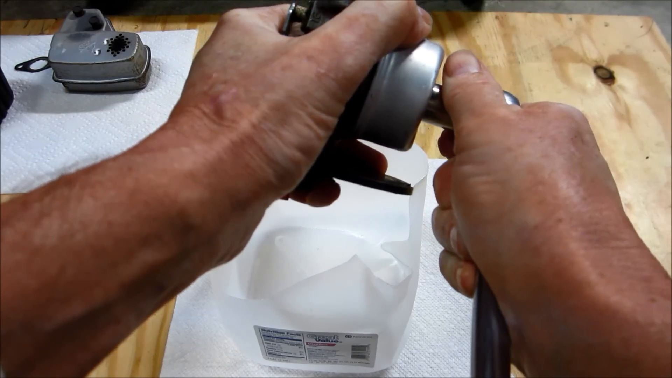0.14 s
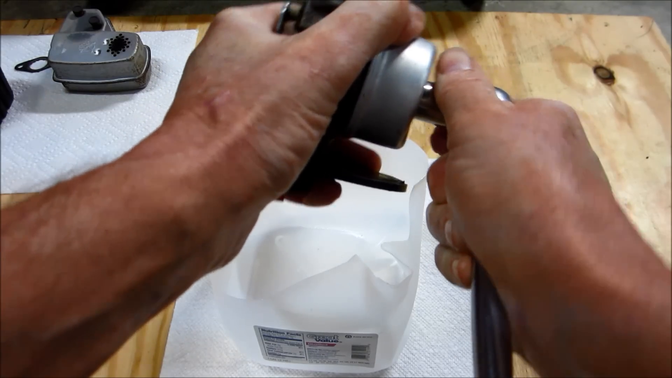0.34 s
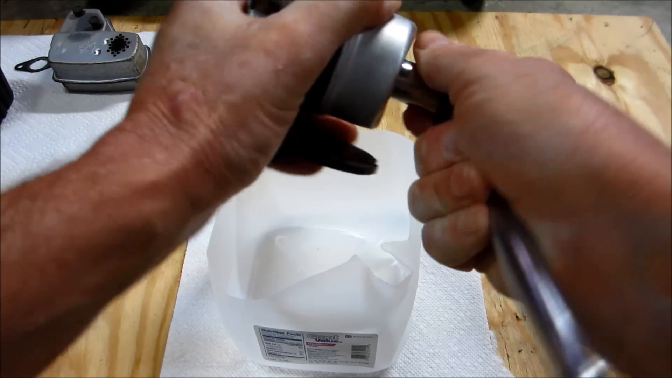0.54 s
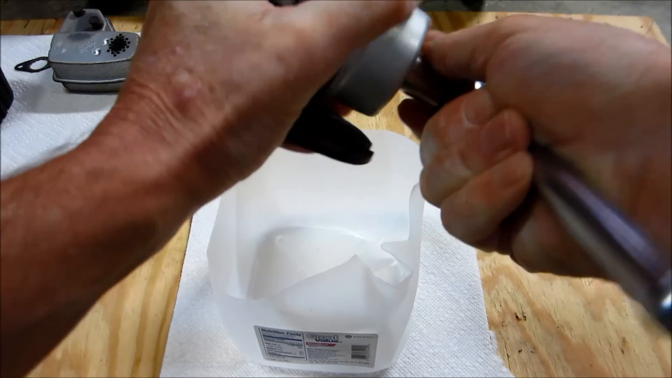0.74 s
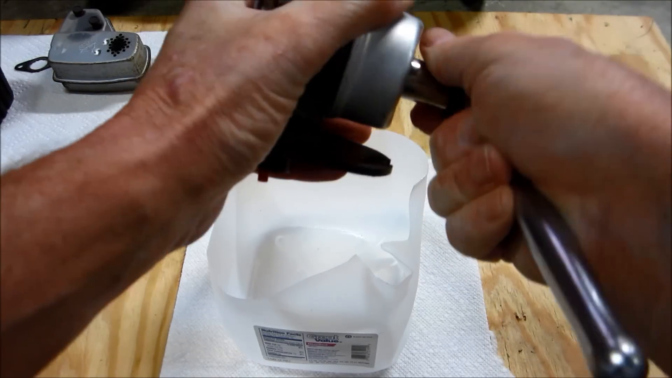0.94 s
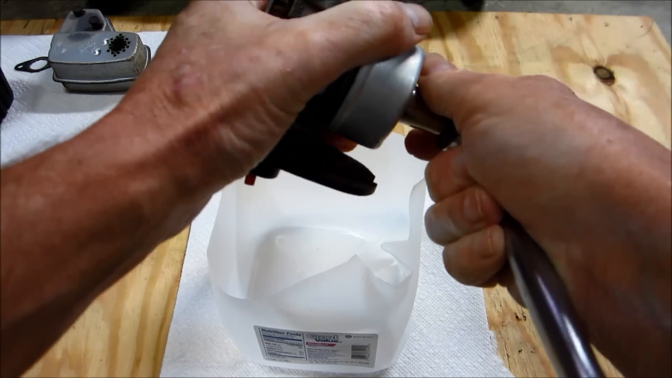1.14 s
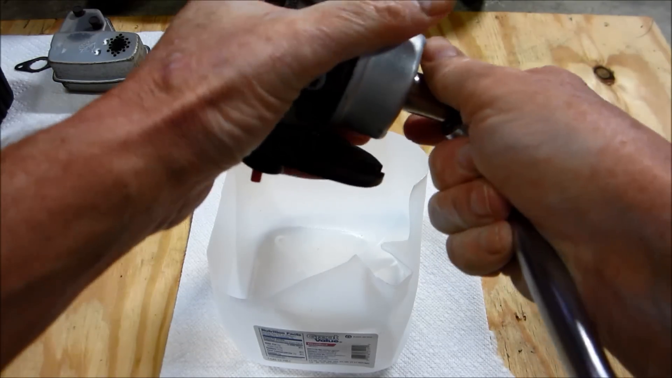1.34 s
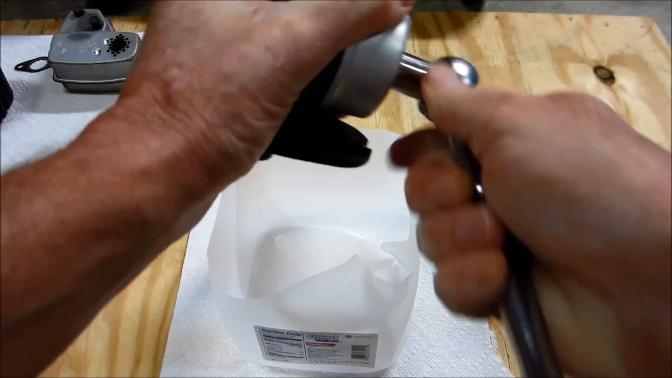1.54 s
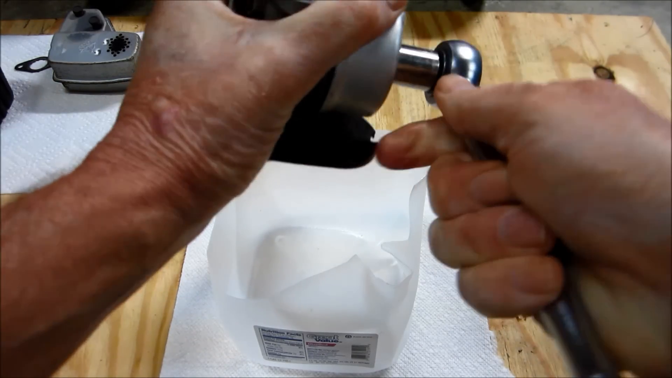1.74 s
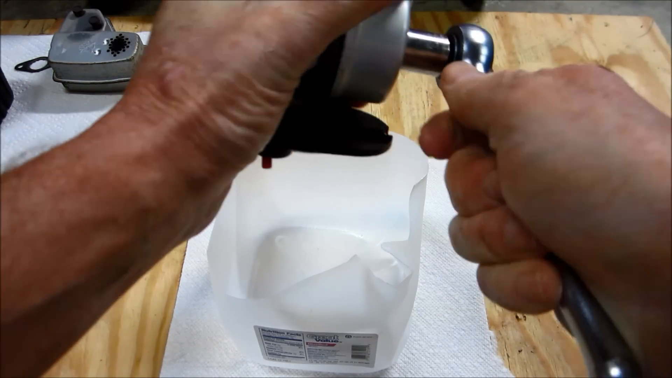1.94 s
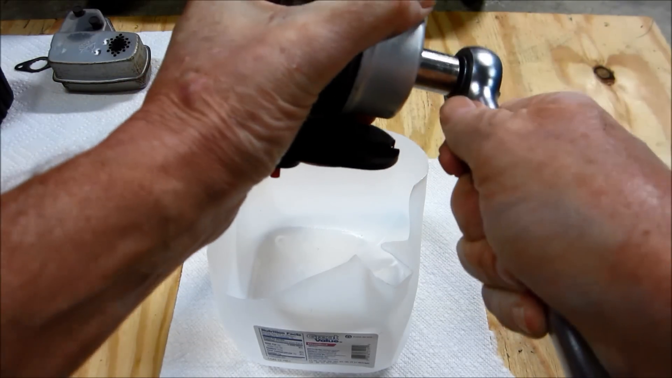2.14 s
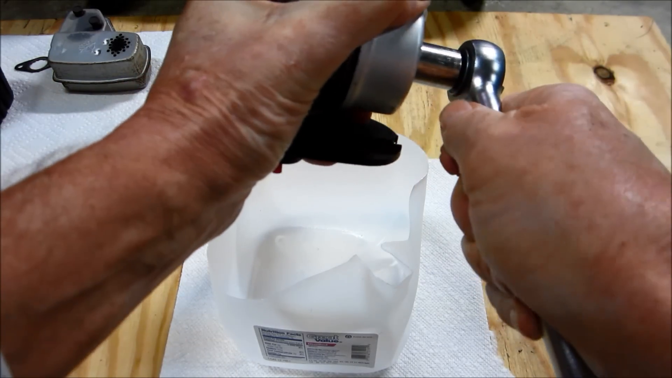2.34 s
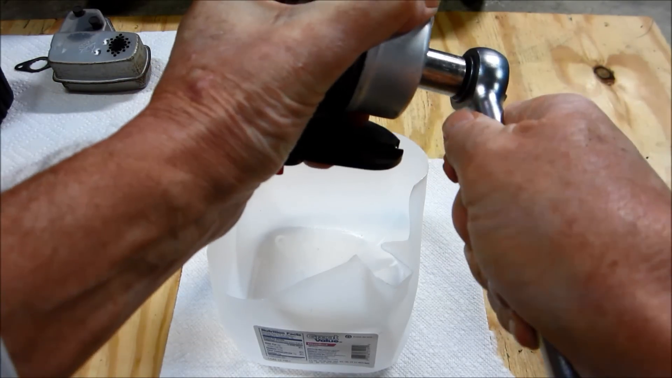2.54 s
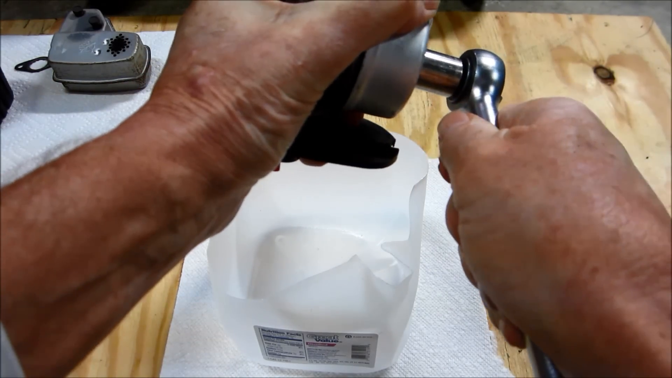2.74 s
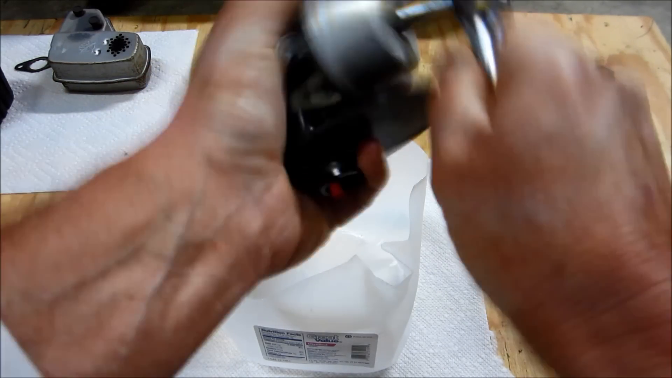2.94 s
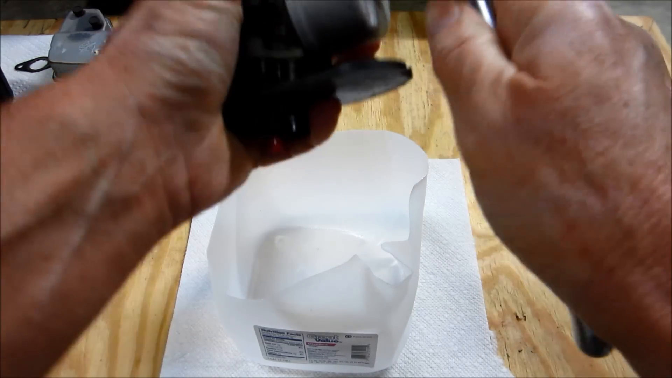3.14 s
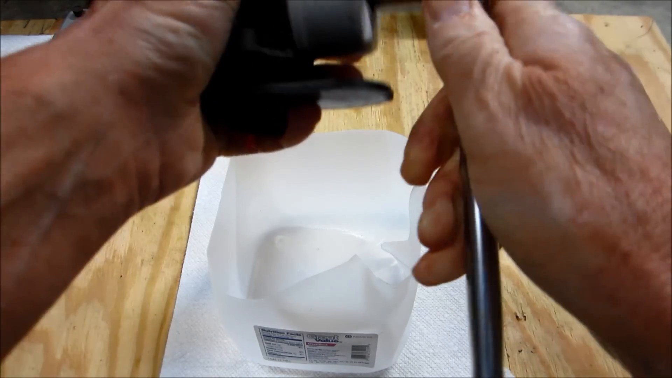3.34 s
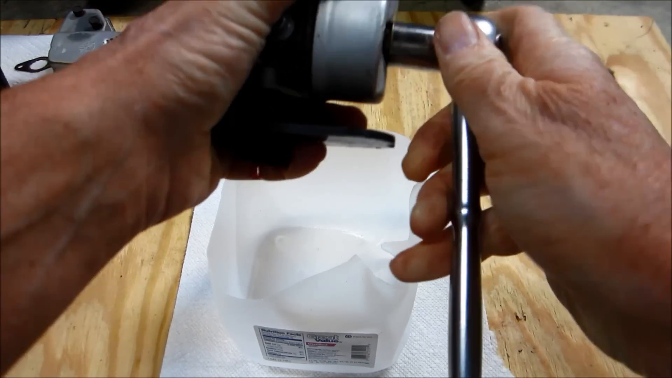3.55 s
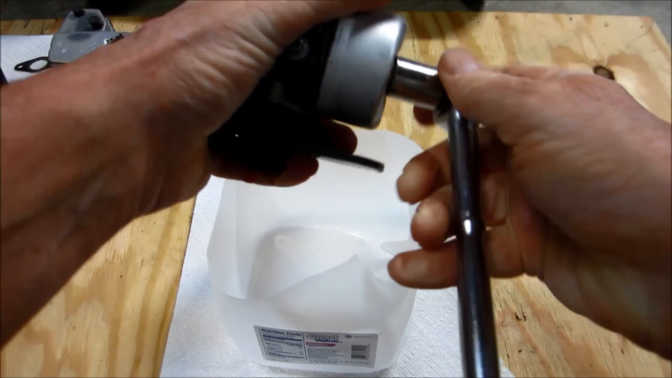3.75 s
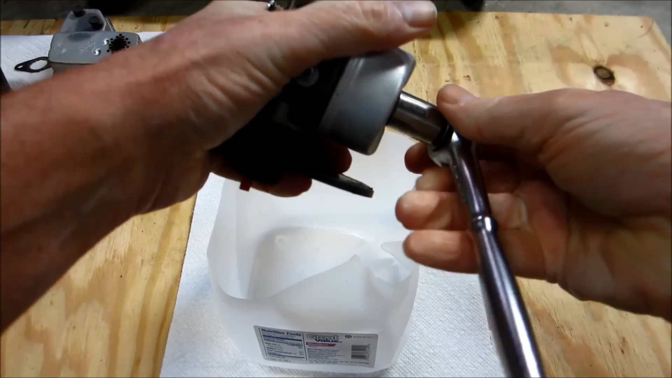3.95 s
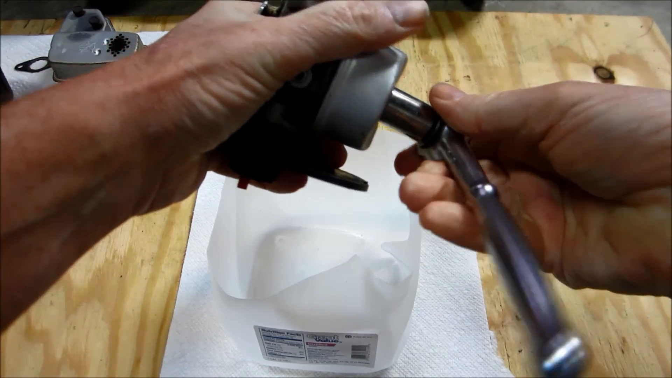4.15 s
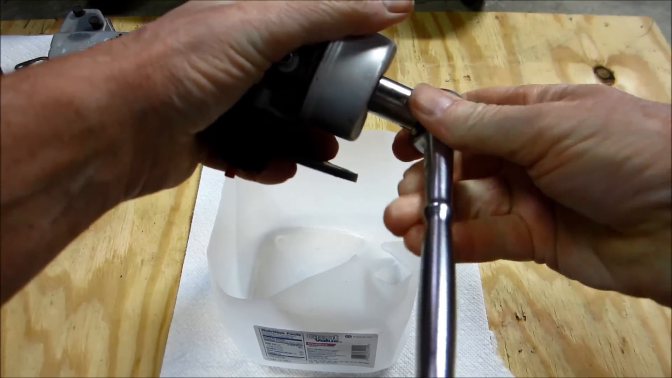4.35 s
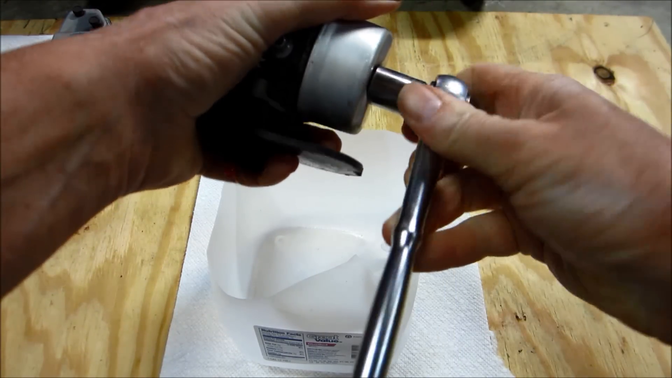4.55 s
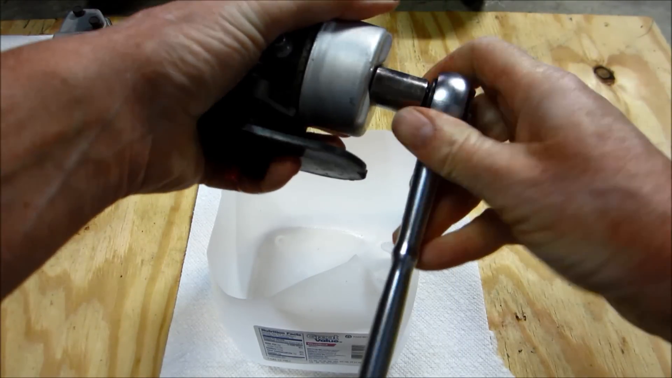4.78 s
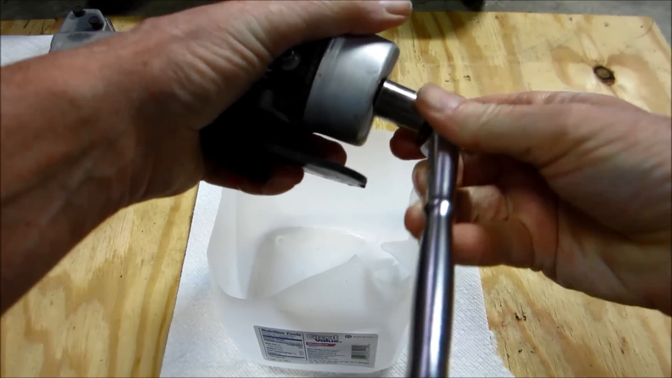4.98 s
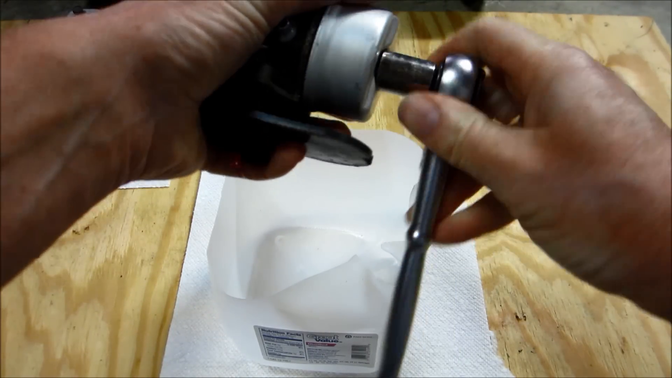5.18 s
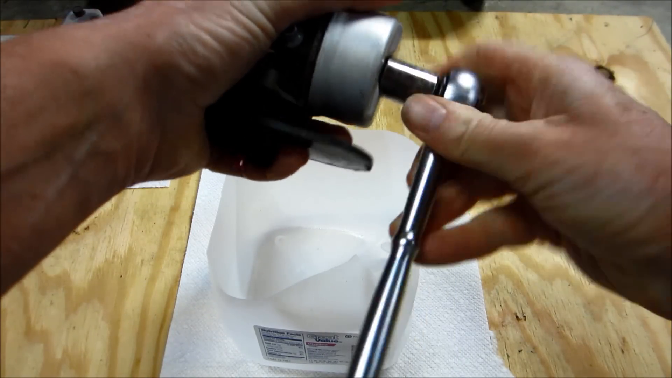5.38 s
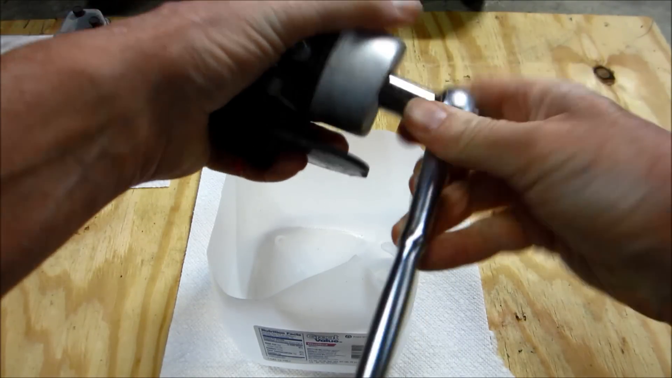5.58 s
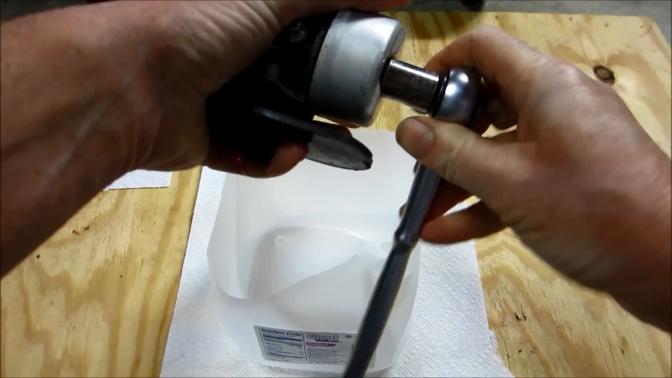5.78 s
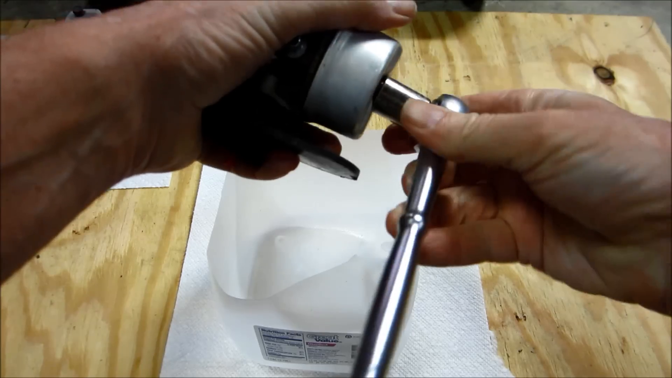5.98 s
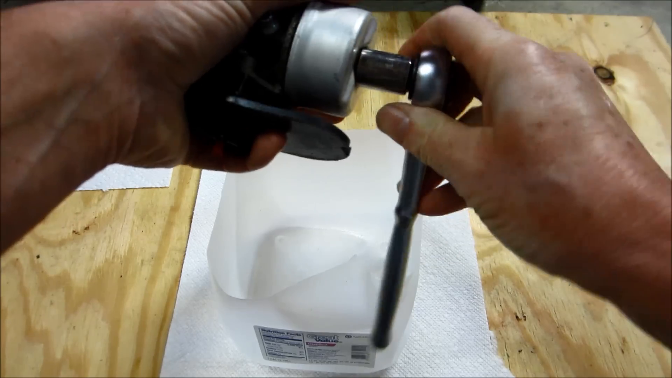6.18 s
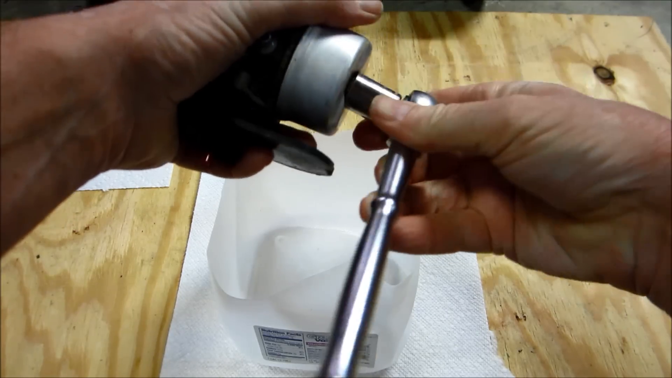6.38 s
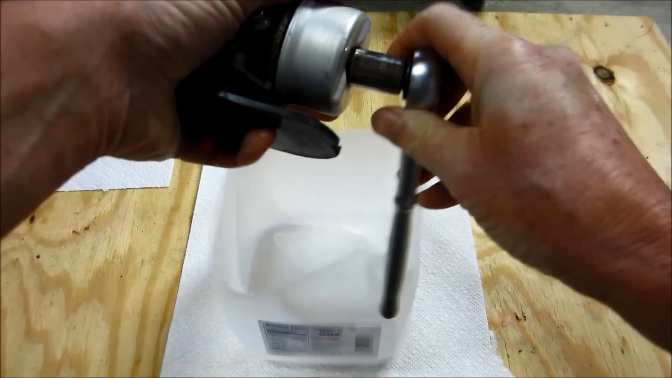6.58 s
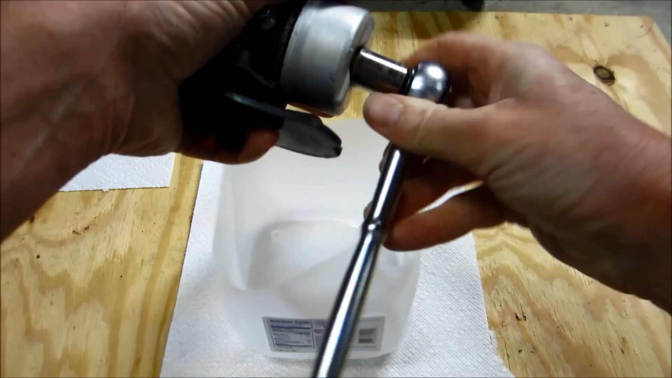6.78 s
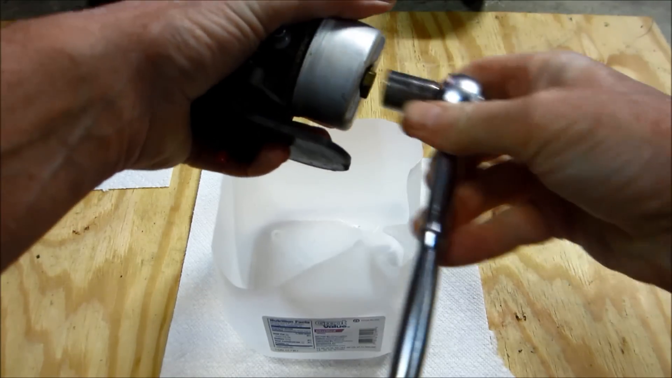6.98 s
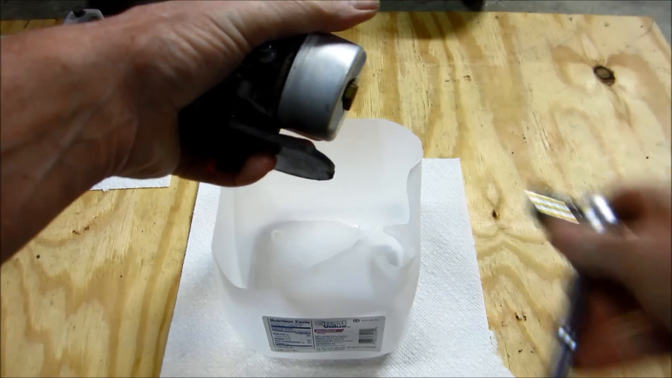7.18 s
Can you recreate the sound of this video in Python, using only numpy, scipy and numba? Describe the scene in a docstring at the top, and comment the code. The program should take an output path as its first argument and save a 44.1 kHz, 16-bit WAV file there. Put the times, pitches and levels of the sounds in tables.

```python
"""A low rumble fills a home workshop; over it a socket ratchet works a nut loose on a small hand-held engine.
The socket rattles on the nut and excites the casing's resonances, and fingers hiss on metal by stick-slip
friction. On each backswing the pawl snaps over the gear teeth and sets the steel handle ringing in its
normal modes. Something knocks once on the bench. A nearby camera's gain control ducks after loud clicks."""
import sys
import numpy as np
from scipy import signal
from scipy.fft import rfft, irfft, next_fast_len
from scipy.io import wavfile
from scipy.ndimage import uniform_filter1d, minimum_filter1d, map_coordinates
from numba import njit

SR = 44100
rng = np.random.default_rng(int(sys.argv[2]) if len(sys.argv) > 2 else 0)


def waveform_to_disk(signal):
    """Save audio, clipped to [-1, 1], as 16-bit WAV at the path in sys.argv[1]."""
    frames = np.transpose(np.atleast_2d(signal))
    scaled = np.clip(frames, -1, 1) * 32767
    samples = np.round(scaled).astype(np.int16)
    wavfile.write(sys.argv[1], SR, samples)


N = 318402

# rumble and hiss of the room: (frequency [Hz], relative spectral density [dB])
ROOM_SPECTRUM = [(20, -6.5), (86, -1), (165, -6), (300, -23), (480, -30.5), (900, -39.5), (1500, -36.5),
                 (1800, -41.5), (3700, -46.5), (7950, -49.5), (15000, -60), (16400, -75)]
# socket and casing rattles, most as the slack is taken up before and after a backswing:
# (time [s], clack level [dB], frequency the struck spot favours [Hz], tick level [dB])
RATTLE_HITS = [(0.1216, -19, 2000, -20), (0.5893, -28.5, 3700, -20.5), (.7862, -34.5, 2800, -42.5),
               (.8425, -29, 3400, -38.5), (0.8633, -28, 2800, -29), (1.6941, -18, 4800, -18),
               (1.7373, -25, 2600, -31), (1.888, -34, 4200, -36), (1.8987, -18, 2400, -40),
               (1.9938, -32, 1200, -31), (2.9342, -11, 2300, -11), (2.9453, -14, 1100, -5.5),
               (2.9693, -5.5, 3100, -10.5), (2.9766, -15, 2800, -18.5), (3.0392, -25.5, 2500, -23.5),
               (3.0882, -6, 3100, -18), (3.1215, -20.5, 3000, -37), (3.3885, -26, 2300, -27),
               (3.394, -17, 3100, -30.5), (3.3996, -21.5, 3100, -17), (4.2237, -32.5, 3000, -42),
               (4.8636, -24, 3000, -38), (4.871, -19, 3000, -39), (5.0873, -13.5, 3050, -22),
               (5.1058, -21.5, 4600, -12), (5.3732, -22, 3000, -43), (5.3912, -21, 3050, -22.5),
               (5.6206, -17, 4600, -19), (5.6519, -19.5, 3000, -12.5), (5.8582, -10, 3100, -18),
               (5.8627, -19, 3100, -7.5), (6.0516, -29, 3000, -35), (6.0756, -13.5, 3000, -40),
               (6.0858, -14, 3100, -25), (6.0962, -15.5, 3200, -17), (6.2805, -17.5, 3000, -23.5),
               (6.2993, -12, 3050, -21), (6.49, -25, 3000, -33), (6.5083, -13.5, 4600, -9.5),
               (6.531, -19.5, 3200, -18), (6.738, -21, 2800, -29), (6.9535, -19, 3000, -36),
               (6.972, -24, 3000, -40)]
# resonances of the casing in the hand: (frequency [Hz], bandwidth [Hz], level [dB])
CASING_MODES = [(900, 900, -7), (2200, 330, -1), (3044, 420, 1.5), (3700, 580, -3), (4604, 250, -3.5)]
# slides of hand and tool: (start [s], end [s], skin hiss level [dB], casing rasp level [dB])
SLIDE_STROKES = [(0.433, 0.628, -65, -59.5), (0.578, 0.618, -41, -51), (0.71, 1.506, -63, -60.5),
                 (0.927, 1.03, -63, -55.5), (1.098, 1.134, -58, -41), (1.169, 1.199, -57, -48.5),
                 (1.32, 1.378, -59.5, -52), (1.46, 1.655, -34, -51), (1.69, 1.745, -50, -47.5),
                 (1.75, 2.028, -57, -55), (2.102, 2.201, -57, -54.5), (2.253, 2.31, -53, -51),
                 (2.926, 2.988, -34.5, -30), (2.97, 3.15, -50, -46), (3.19, 3.46, -49, -54),
                 (4.5, 4.769, -59.5, -63), (4.808, 4.893, -61.5, -52.5), (4.95, 6.95, -53, -56),
                 (5.84, 5.875, -48, -31.5), (6.053, 6.11, -55, -39), (6.278, 6.316, -53, -32.5),
                 (6.942, 6.986, -56.5, -41)]
# skin rubbing on steel: (frequency [Hz], relative spectral density [dB])
SKIN_SPECTRUM = [(2500, -18), (5300, -6), (7300, -7), (11600, -1.5), (16000, -18.5)]
# pawl snaps: (time [s], crack level [dB], handle ring level 6 ms later [dB])
PAWL_SNAPS = [(0.6372, -3, -13), (0.6617, -0.5, -17), (0.687, -8, -11), (3.6474, -7, -17.5),
              (3.7136, -4.5, -22.5), (3.7745, -11, -17), (3.851, -7, -17.5), (3.8973, 0, -17),
              (3.9542, -9, -21.5), (4.0397, -5, -22), (4.1151, -5, -21), (4.8918, -5.5, -17),
              (4.9081, -3.5, -11.5), (4.9271, -2, -18.5), (4.9562, -5.5, -19), (5.0213, -3, -21),
              (5.4139, 4.5, -16.5), (5.4296, -0.5, -14), (5.444, 3, -18.5), (5.4582, 1.5, -23),
              (5.476, -1.5, -9.5), (5.498, 1.5, -18.5), (5.5666, 4, -21), (5.879, 7, -9), (5.895, 6, -15),
              (5.9105, 0, -21), (5.9278, -1, -14), (5.9486, 2, -14), (5.9823, -4, -21), (6.3163, 5, -24.5),
              (6.3284, 4, -27), (6.3415, -2, -33), (6.3548, -3, -26.5), (6.3684, -2.5, -20),
              (6.3847, -4, -12.5), (6.4045, 1, -18), (6.7659, 6, -22), (6.7864, -1, -12.5),
              (6.808, 1, -16.5), (6.8312, 0.5, -18.5), (6.8621, -4.5, -22)]
# colour of the snap: (frequency [Hz], relative spectral density [dB])
CRACK_SPECTRUM = [(900, -39), (2200, -23.5), (4200, -15), (5600, -16), (7200, -4), (8800, 0.5),
                  (10500, -12), (16000, -16)]
# modes of the free handle:
# (frequency [Hz], t60 [s], close partner frequency [Hz], partner level [dB], afterring level [dB])
HANDLE_MODES = [(4605, .058, 4690, -10, -19), (8850, 0.036, 8970, -7, -25), (12330, .035, 12110, -4, -13),
                (14235, .042, 14010, -5.5, -20)]
# the grip on each backswing: (start [s], level of mode 1 [dB], of mode 3 [dB], of mode 4 [dB], all
# relative to mode 2, t60 factor [ratio], afterring and grit boost [dB], casing level over the crack [dB])
BACKSWING_GRIPS = [(.6, -7, -13, -26, .55, 5, -34), (3.6, -6.5, -4.5, -7, 1.1, 0, -33),
                   (4.85, -13, -14, -8.5, .8, 0, -26), (5.38, -15.5, -17, -1.5, .9, 3, -22),
                   (5.84, -23, -22, -17, 1.1, 5, -20), (6.28, -4.5, -1.5, -3, .8, 3, -22),
                   (6.72, -11, -6.5, -1, .7, 0, -28)]
# modes of the knock on the bench: (frequency [Hz], level [dB], t60 [s])
KNOCK_MODES = [(120, -7, .15), (175, -8, .2), (305, -11, .15), (523, -12, 0.26), (572, -5, 0.21),
               (626, -6, 0.24), (695, 2, 0.16), (786, -12, 0.14), (1385, -10, 0.12), (1500, -10, .1)]
# reverberation of the workshop: (frequency [Hz], t60 [s])
ROOM_DECAY = [(500, 0.45), (4000, 0.3), (14000, 0.11)]


def amp(db):
    """Decibels to amplitude ratio."""
    return 10 ** (np.asarray(db) / 20)


def unit_rms(x):
    """The signal scaled to rms 1."""
    return x / np.sqrt(np.mean(x ** 2) + 1e-20)


def log_interp(points, hz):
    """Interpolation of (frequency [Hz], value) points on a logarithmic axis."""
    freqs, values = np.transpose(points)
    return np.interp(np.log(hz + 1), np.log(freqs + 1), values)


def filtered(x, response):
    """Linear filtering: the spectrum is multiplied by a frequency response."""
    size = next_fast_len(len(x) + 8192)
    return irfft(rfft(x, size) * response(np.fft.rfftfreq(size, 1 / SR)), size)[:len(x)]


def resonances(table):
    """Response of damped oscillators in superposition: (frequency [Hz], bandwidth [Hz], level [dB])."""
    return lambda hz: sum((-1) ** k * amp(db) * 1j * hz * width / (f0 * f0 - hz * hz + 1j * hz * width)
                          for k, (f0, width, db) in enumerate(table))


def noise(response, size=N):
    """White noise coloured by a response, at rms 1."""
    return unit_rms(filtered(rng.standard_normal(size), response))


def band_noise(centre_hz, width_hz, size=SR):
    """Noise through two equal resonators in cascade."""
    return noise(lambda hz: resonances([(centre_hz, width_hz, 0)])(hz) ** 2, size)


def wobble(rate, size=N):
    """A smooth random curve with rate knots a second."""
    return map_coordinates(rng.standard_normal(int(size * rate / SR) + 4), [np.arange(size) * rate / SR])


def burst(envelope, carrier):
    """A noise burst with exactly the energy of its envelope."""
    x = envelope * carrier
    return x * np.linalg.norm(envelope) / np.linalg.norm(x)


def add(track, start_s, sound):
    """Superpose a sound on the track."""
    part = track[round(start_s * SR):][:len(sound)]
    part += sound[:len(part)]


def room_noise():
    """Broadband background noise, its rumble slowly amplitude-modulated, with a faint narrowband whine."""
    swell = amp(.7 * wobble(1.5) + 1.2 * wobble(7.6))
    bed = noise(lambda hz: amp(log_interp(ROOM_SPECTRUM, hz)))
    rumble = filtered(bed, lambda hz: 1 / (1 + (hz / 400) ** 4))
    hiss = bed - rumble
    whine = noise(resonances([(7900, 55, 0)]))
    return amp(-34) * (swell * rumble + hiss) + amp(-73.5) * whine


def socket_rattles():
    """Impact excitation: loose metal ticks and clacks, and the struck spot weights the casing's modes."""
    out, t = np.zeros(N), np.arange(SR // 25) / SR
    thud_mode = (1900, 1800, -17)  # broad and dull, under every clack
    faint_hits = rng.random((round(5 * N / SR), 4)) * [N / SR, 14, 2000, 14] + [0, -55, 1999, -55.5]
    for start, clack_db, spot_hz, tick_db in [*RATTLE_HITS, *faint_hits]:
        clack_noise, tick_noise = rng.standard_normal((2, len(t)))
        struck = [(hz, width, db - 59.5 * np.log2(hz / spot_hz) ** 2) for hz, width, db in CASING_MODES]
        clack = filtered(amp(-60 * t / .011) * clack_noise, resonances([*struck, thud_mode]))
        # the more a tick outweighs its clack, the higher it lies
        tick_hz = 7000 * 2 ** (.029 * (tick_db - clack_db) + .15 * rng.standard_normal())
        bright = filtered(tick_noise, lambda hz: amp(-16 * np.log2((hz + 1) / tick_hz) ** 2))
        tick = (amp(-60 * t / .007) + amp(-25 - 60 * t / .04)) * unit_rms(bright)
        add(out, start, amp(clack_db) * clack / np.abs(clack).max() + amp(tick_db) * tick)
    return out


def finger_slides():
    """Stick-slip friction: skin on steel makes a grainy hiss and rasps through the casing's resonances."""
    hiss_level, rasp_level = np.full(N, amp(-68)), np.full(N, amp(-65.5))  # hands never rest quite still
    swell_db = 7
    for start, end, hiss_db, rasp_db in SLIDE_STROKES:
        size = round((end - start) * SR)
        stroke = np.hanning(size) ** .46 * amp(swell_db * np.linspace(-.5, .5, size))
        add(hiss_level, start, amp(hiss_db) * stroke)
        add(rasp_level, start, amp(rasp_db) * stroke)
    stick_slip = amp(3.5 * wobble(300) + 1.6 * wobble(40))
    hiss = stick_slip * noise(lambda hz: amp(log_interp(SKIN_SPECTRUM, hz)))
    casing, broad = resonances(CASING_MODES[1:]), resonances([(2600, 2200, -6)])
    grain = amp(3 * wobble(150))
    rasp = grain * noise(lambda hz: (casing(hz) + broad(hz)) * hz ** 2 / (hz ** 2 + 1300 ** 2))
    return hiss_level * unit_rms(hiss) + rasp_level * unit_rms(rasp)


def pawl_snaps():
    """Damped free vibration: each snap cracks, clacks the casing and leaves the handle's modes ringing."""
    out, t = np.zeros(N), np.arange(SR // 5) / SR
    grit = noise(lambda hz: amp(log_interp(CRACK_SPECTRUM, hz)), SR)
    casing = noise(resonances(CASING_MODES[1:]), SR)
    skirts = [band_noise(.93 * hz, 1800) for hz, *_ in HANDLE_MODES]
    fuzzes = [band_noise(hz, .03 * hz) for hz, *_ in HANDLE_MODES]
    attack = 1 - np.exp(-t / .00035)
    crack_envelope = amp(-60 * t / .012) * attack
    for start, crack_db, ring_db in PAWL_SNAPS:
        grip = [row for row in BACKSWING_GRIPS if row[0] <= start][-1]
        _, mode1_db, mode3_db, mode4_db, t60_factor, boost_db, casing_db = grip
        scatter = rng.standard_normal((len(HANDLE_MODES), 5))  # each tooth drives the modes differently
        span = rng.integers(SR // 2) + np.arange(len(t))
        grit_tail = amp(boost_db - 31 - 60 * t / .055) * attack
        snap = amp(crack_db) * burst(crack_envelope + grit_tail, grit[span])
        snap += amp(crack_db + casing_db - 60 * t / .03) * attack * casing[span]
        for k, grip_db in enumerate((mode1_db, 0, mode3_db, mode4_db)):
            hz, free_t60, partner_hz, partner_db, afterring_db = HANDLE_MODES[k]
            detune, balance, phase, drive, sustain = scatter[k]
            mode_db = ring_db + grip_db + 3 * drive
            # the grip shifts pitch and damping a little from tooth to tooth
            turn = 2 * np.pi * (1 + .0028 * detune) * t
            t60 = free_t60 * t60_factor * np.exp(.25 * sustain)
            pair = np.sin(hz * turn) + amp(partner_db + 3.4 * balance) * np.sin(partner_hz * turn + phase)
            ring = amp(-60 * (t - .006) / t60) * pair
            afterring = amp(afterring_db + boost_db - 60 * t / .2) * fuzzes[k][span]
            snap += amp(mode_db) * (ring + afterring) * attack
            snap += amp(mode_db + 8) * burst(crack_envelope, skirts[k][span])  # the mode colours the crack
        add(out, start, snap)
    return filtered(out, lambda hz: 1 / (1 + (hz / 15600) ** 30))  # little sounds above the top mode


def bench_knock(start_s=6.6348, level_db=8.54):
    """One dull, hollow blow excites low, quickly damped modes, with a boom of noise and a slap."""
    out, t = np.zeros(N), np.arange(SR // 2) / SR
    ring = np.zeros(len(t))
    for hz, db, t60 in KNOCK_MODES:
        flutter = amp(3.2 * wobble(62.5, len(t)))  # loose walls make each mode flutter
        ring += flutter * amp(db - 60 * t / t60) * np.sin(2 * np.pi * hz * t)
    boom = band_noise(660, 380, len(t)) * amp(-17 - 60 * t / .28)
    slap_envelope = amp(-13 - 60 * t / .03) + amp(-22 - 60 * t / .19)
    slap = noise(resonances([(1800, 1800, 0)]), len(t)) * slap_envelope
    attack = 1 - np.exp(-t / .0022)
    add(out, start_s, amp(level_db) * ((amp(-13.5) * ring + boom) * attack + slap))
    return out


def reverberation(x):
    """Convolution with a diffuse tail that decays exponentially, faster at high frequencies."""
    hz, t, spectrum = signal.stft(rng.standard_normal(SR // 2), SR, nperseg=256)
    decay = amp(-60 * t / log_interp(ROOM_DECAY, hz)[:, None])
    tail = signal.istft(spectrum * decay, SR, nperseg=256)[1]
    delayed = np.pad(x, (200, 0))
    return signal.fftconvolve(delayed, tail / np.linalg.norm(tail))[:N]


@njit
def gain_control(target_db, start_db, attack_s, release_db_per_s):
    """Attack and release: gain falls exponentially towards its target and climbs back at a steady rate."""
    out, gain_db = np.empty_like(target_db), start_db
    for i in range(len(out)):
        gap = target_db[i] - gain_db
        gain_db += gap / (attack_s * SR + 1) if gap < 0 else min(release_db_per_s / SR, gap)
        out[i] = gain_db
    return out


def scene():
    """Superposition of the impacts, their reverberation, the friction and the room noise."""
    impacts = pawl_snaps() + socket_rattles() + bench_knock()
    return (impacts + amp(-20) * reverberation(impacts) + finger_slides() + room_noise())[None]


def record(dry):
    """Dynamic compression: gain control on the peaks, soft clipping of what slips past, a band limit."""
    ceiling_db = -10
    peaks = -minimum_filter1d(-np.abs(dry[0]), size=24)
    target_db = np.minimum(0, ceiling_db - 20 * np.log10(peaks + 1e-9))
    gain_db = gain_control(target_db, start_db=-8.0, attack_s=.0027, release_db_per_s=11.5)
    ducked = dry[0] * amp(uniform_filter1d(gain_db, size=48))
    clipped = ducked / (1 + np.abs(ducked) ** 6) ** (1 / 6)
    return filtered(clipped, lambda hz: (hz < 16700) / (1 + (hz / 16000) ** 30))[None]


dry = scene()
out = record(dry)
waveform_to_disk(out)
```